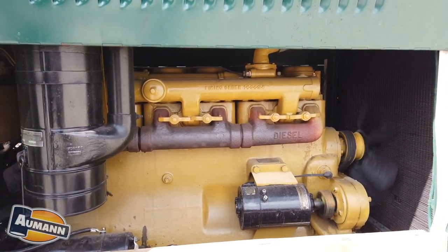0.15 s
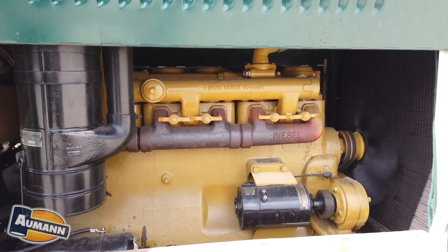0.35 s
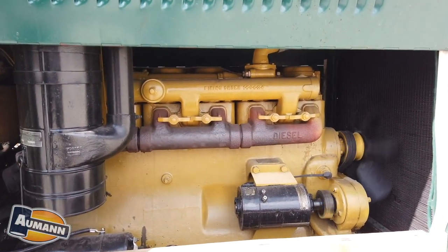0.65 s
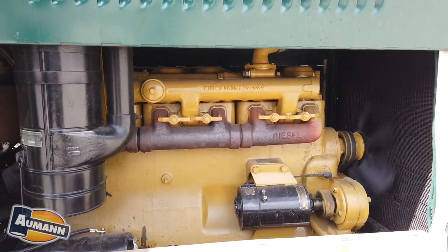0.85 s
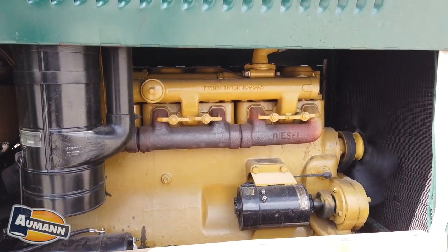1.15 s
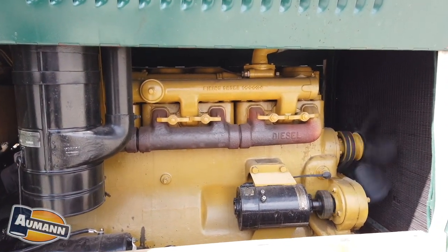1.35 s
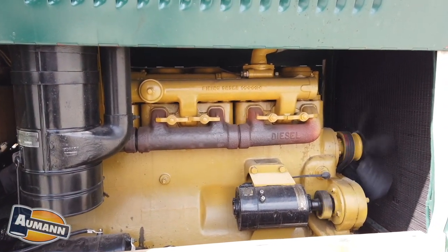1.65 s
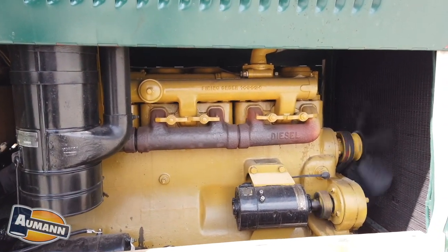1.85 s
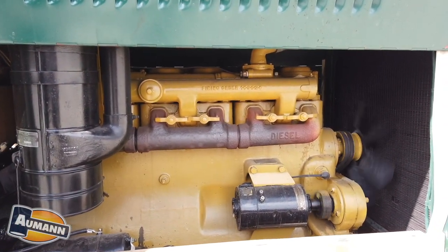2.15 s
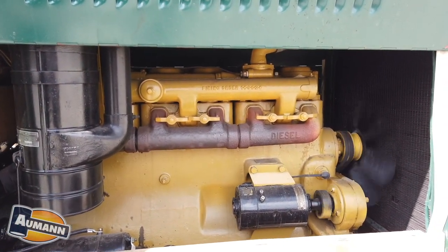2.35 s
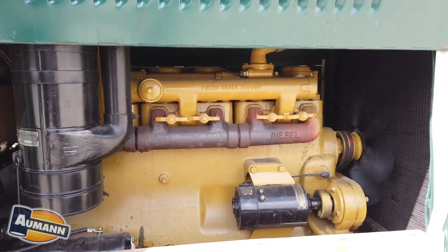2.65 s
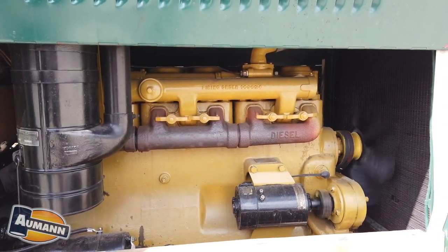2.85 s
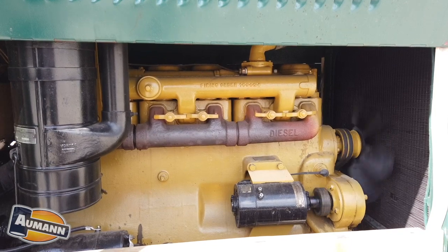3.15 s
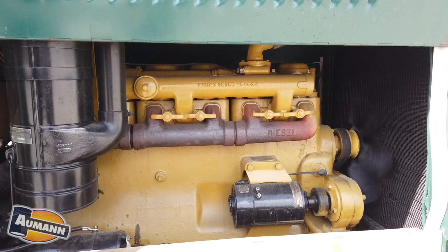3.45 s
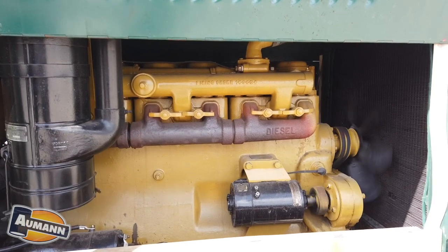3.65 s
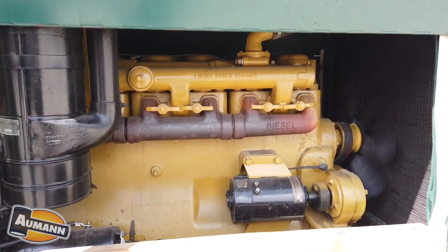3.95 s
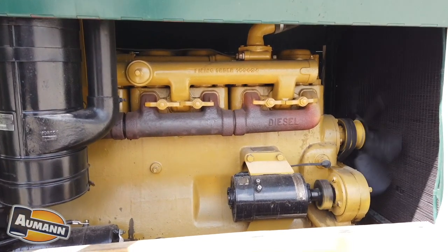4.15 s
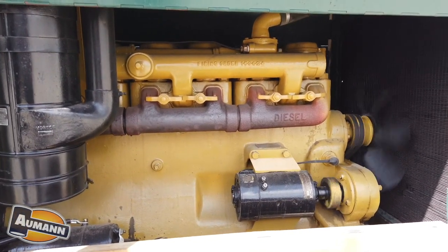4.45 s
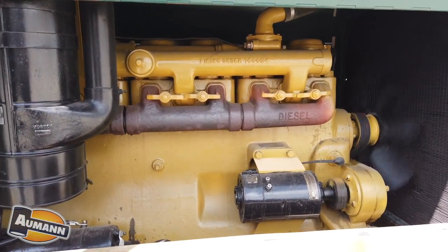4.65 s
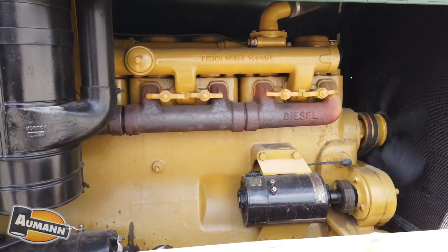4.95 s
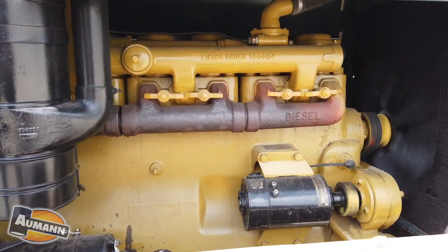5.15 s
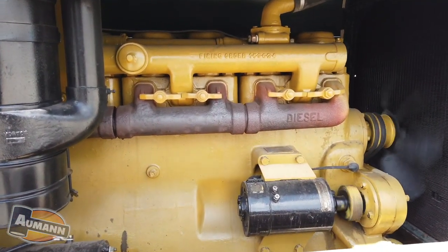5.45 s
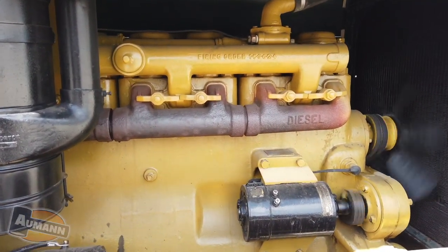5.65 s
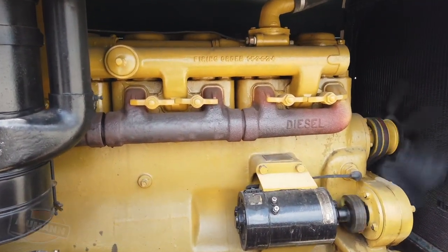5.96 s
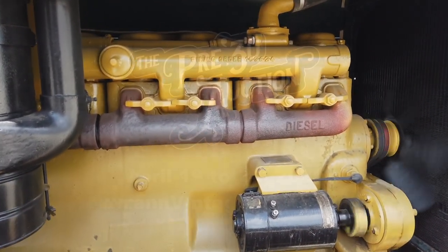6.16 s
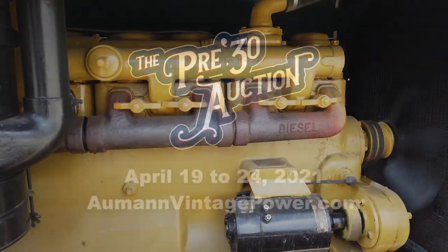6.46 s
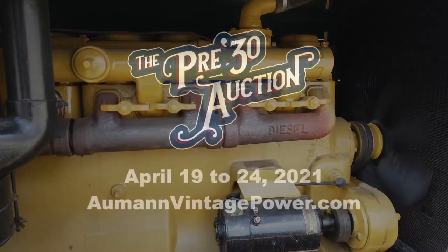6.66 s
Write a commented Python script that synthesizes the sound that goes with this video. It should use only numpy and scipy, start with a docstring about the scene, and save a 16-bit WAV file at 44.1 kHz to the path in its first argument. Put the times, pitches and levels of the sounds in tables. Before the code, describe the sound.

A big old diesel idles close by, knocking and ticking steadily over a fan roar, while wind gusts increasingly thump and overload the microphone.

```python
"""Idling diesel in gusty wind

A large old six-cylinder diesel idles in its open housing, close to a small microphone.
Each firing knocks and rings as noise and sines, valves and injectors tick as bursts through resonances,
and sines on the crankshaft hum over the fan's roar of shaped noise. Gusts of low noise buffet the
microphone, lightly at first, then with pressure strokes hard enough to drive its limiter."""
import sys
import numpy as np
from scipy import signal
from scipy.fft import rfft, irfft
from scipy.io import wavfile
from scipy.ndimage import uniform_filter1d

SR = 44100
rng = np.random.default_rng(int(sys.argv[2]) if len(sys.argv) > 2 else 0)


def log_audio(samples):
    """Write samples as a 16-bit WAV file to the path given in sys.argv[1]."""
    # one column per channel
    frames = np.atleast_2d(samples).T
    # limit to full scale, then quantise
    limited = np.clip(frames, -1, 1)
    pcm = np.round(limited * 32767).astype(np.int16)
    wavfile.write(sys.argv[1], SR, pcm)


N = 299439
STEP = 10  # envelopes are drawn at every tenth sample

# slow loudness of the engine at the microphone, fading at the end: (time [s], level [dB])
ENGINE_LEVEL = [(0, -41), (3.4, -41.5), (4.6, -41), (5.1, -40.5), (5.8, -43), (6.05, -41.5), (6.4, -42),
                (6.55, -47), (6.76, -46.5), (6.79, -61)]
# combustion knock of each cylinder:
# (place in the cycle [firings], ring level [dB], ring centre [Hz], low thud level [dB])
CYLINDER_KNOCKS = [(.8, -4, 2885, -2.5), (1.8, 1.5, 2857, -3), (2.75, 2.5, 3120, -3), (3.8, 2, 3212, -16),
                   (4.8, -2.5, 2936, -2), (5.85, 3, 3024, -10)]
# resonances of the block: (frequency [Hz], width [Hz], relative level [dB])
BLOCK_MODES = [(271, 14, 4.5), (392, 26, 10), (540, 59, -20), (692, 170, -6), (883, 87, 6), (1183, 13, 8.5),
               (1890, 620, -4), (2410, 19, -7)]
# valve and injector ticks:
# (place in the cycle [firings], level [dB], t60 [s], brightness [dB per octave], favoured frequency [Hz])
VALVE_TICKS = [(.43, -9.5, 0.03, -1, 9050), (.8, -17, 0.15, 9, 6120), (1.64, 3, 0.017, -0.5, 14100),
               (1.81, -6.5, 0.11, 8.5, 4480), (2.42, -21, 0.037, 1.5, 8900), (2.7, -15.5, 0.19, 4.5, 12200),
               (3.45, -22, 0.028, -13, 9100), (3.82, -9.5, 0.054, 12, 9800), (4.38, -12, 0.021, 11, 9000),
               (4.75, -19, 0.19, 14, 6630), (5.65, -11.5, 0.062, -6, 9000), (5.83, -10, 0.074, 16, 11600)]
# resonances of the valve gear: (frequency [Hz], width [Hz], relative level [dB])
GEAR_MODES = [(3990, 280, -12.5), (4170, 380, 4.5), (4750, 330, -1), (5630, 400, 5), (6180, 390, -3),
              (7390, 1270, -6.5), (8200, 780, -5.5), (8890, 240, -5), (9600, 800, -8.5), (10560, 600, -8),
              (11000, 1400, -13.5), (12800, 940, -14), (13700, 1000, -20.5), (14800, 940, -17.5)]
# the microphone drifts along the engine:
# (time [s], valve gear level [dB], valve gear brightness [dB per octave])
MIC_DRIFT = [(0, -1, 2), (1, -1, 2), (2, -2, 1.5), (3, -1.5, -0.5), (3.8, -3.5, -.6), (4.3, -1, -1.5),
             (4.9, -2, -2.5), (5.7, -1, 1.5), (6.2, -1, 1), (6.5, -1, 3), (6.79, 2, -3)]
# steady hum: (multiple of the firing rate [ratio], relative level [dB])
HUM_ORDERS = [(3, -57.5), (3.5, -75), (4, -59), (6, -66.5), (6.5, -63), (7, -72), (7.5, -65), (8, -63.5),
              (9, -65.5), (10, -59), (12, -54.5), (16, -55.5), (17.5, -67.5), (22, -55.5), (24, -62),
              (25, -57)]
# spectrum of fan, intake and rattle: (frequency [Hz], relative level per Hz [dB])
ROAR_SPECTRUM = [(35, -7), (60, -1), (142, -5.5), (386, -2), (487, -5), (587, -1), (659, -2), (1100, -8),
                 (1210, -7.5), (1830, -11), (2990, -16), (3950, -29), (6910, -36.5), (10500, -37.5),
                 (15600, -49)]
# slow heave of the air at the microphone: (time [s], level [dB])
HEAVE_LEVEL = [(0.0, -21), (0.76, -37.5), (0.93, -17), (1.23, -48.5), (1.42, -28.5), (2.15, -29),
               (2.55, -18.5), (2.82, -37), (3.16, -19.5), (3.5, -19), (3.54, -9), (3.78, -19), (3.84, -8.5),
               (4.27, -16), (4.31, -23), (4.8, -20), (4.9, -10), (5.14, -26.5), (5.29, -19.5), (5.96, -11),
               (6.03, -23), (6.17, -9), (6.58, -11.5), (6.79, -16)]
# gusts of finer turbulence: (start [s], length [s], flutter level [dB], rustle level [dB])
FINE_GUSTS = [(0.137, 0.21, -39.5, -66), (0.502, 0.11, -42, -55), (0.849, 0.11, -31.5, -51),
              (1.852, 0.052, -41, -75), (2.084, 0.078, -44, -55), (3.127, 0.32, -38.5, -67),
              (3.525, 0.11, -17.5, -35), (3.74, 0.089, -12, -48), (3.93, 0.17, -13, -32.5),
              (4.428, 0.15, -34, -54), (5.257, 0.054, -9, -33), (5.33, 0.092, -21.5, -36),
              (5.497, 0.13, -19.5, -38.5), (5.782, 0.086, -11.5, -35), (5.901, 0.043, -10, -10),
              (5.948, 0.063, -4, -15.5), (6.024, 0.043, -0.5, -27), (6.127, 0.1, -7, -56),
              (6.421, 0.076, -13.5, -41), (6.61, 0.25, -31.5, -46)]
# floor between gusts: (flutter level [dB], rustle level [dB])
CALM_LEVELS = [-59, -70]
# hard buffets, a suck then a slam; the engine's level moves between the two (mostly up)
# and again after the slam's peak (mostly down):
# (time [s], peak pressure ahead of the limiter [1], half length [s], swell [dB], dip [dB])
HARD_BUFFETS = [(0.897, 0.16, 0.011, 0, -1), (3.55, 0.52, .014, 3, -2.5), (3.652, .35, 0.018, 1.5, -2.5),
                (3.779, 0.15, 0.036, -1, -6.5), (3.912, 0.53, 0.046, 3.5, 2),
                (4.004, 0.66, 0.021, -2.5, -1), (4.164, 0.38, 0.02, .6, 1.2), (4.229, 0.28, 0.022, 3, 1),
                (4.69, 0.11, 0.04, 0, 2.5), (4.98, 0.15, .045, 3, 1), (5.261, 0.38, 0.023, 4, -7.5),
                (5.373, 0.53, 0.043, 4, -12), (5.683, 0.44, 0.07, 9, 5), (5.879, 1.17, .013, -1, -5.5),
                (5.943, 0.55, 0.0086, 7.5, -2), (6.023, 0.81, 0.0089, 2, -3.5), (6.134, 0.46, .018, 7, -7),
                (6.199, 0.6, .025, 7, -11), (6.068, 0.78, .012, 4, -5), (6.331, 0.95, 0.029, 1.2, 5.5),
                (6.394, 0.34, 0.015, 6.5, -2.5), (6.493, 0.28, 0.025, 3, -5.5)]

FIRING_HZ = 24.67  # mean rate of the idle
# the governor hunts: firings ahead of a steady idle
HUNT_MEAN, HUNT_SWING, HUNT_PERIOD_S, HUNT_PEAK_S = -0.2693, 0.1987, 6.15, 1.84
PING_DB, BONK_HZ, BONK_DB = 8, 819, 10  # clean rings of the gas and of one panel
SCATTER_DB = 4.0  # how unevenly one tick shakes the modes
SLIP = .0055  # turns by which a hum of order 1 wavers against the crankshaft
GUST_RISE_S, GUST_FALL_S = 0.019, 0.054  # exponential time constants
LUMPY_DB, LUMPS_HZ = 1.5, 7.7  # chance unevenness of all turbulence
SWELL_WIDTH, DIP_AFTER, DIP_S = 0.52, 1.38, 0.012  # in half lengths, in half lengths, in s
EDGE_HZ = 15750  # top of the recorded band


def gain_of(db):
    """Turns decibels into a factor."""
    return 10 ** (np.asarray(db) / 20)


def evened(x):
    """Scales to rms 1."""
    return x / np.sqrt(np.mean(x ** 2) + 1e-20)


def curve(rows):
    """Draws every column of a table against its times, sample by sample."""
    s, *columns = np.transpose(rows)
    return [np.interp(np.arange(N) / SR, s, c) for c in columns]


def coloured(x, gain):
    """Filters by a gain given as a function of frequency."""
    return irfft(rfft(x) * gain(np.fft.rfftfreq(N, 1 / SR) + 1e-3), N)


def resonate(x, hz, width):
    """A fixed resonance of gain 1 at its peak."""
    return signal.lfilter(*signal.iirpeak(hz, hz / width, SR), x)


def glide(x, hz, width):
    """Shifts the curve hz down to zero, smooths twice, and shifts back: a steep moving resonance."""
    turn = np.exp(2j * np.pi * np.cumsum(hz) / SR)
    r = np.exp(-np.pi * width / SR)
    smooth = signal.lfilter([(1 - r) ** 2], [1, -2 * r, r ** 2], x / turn)
    return 2 * (turn * smooth).real


def held(envelope):
    """Spreads a coarse envelope over every sample."""
    return np.repeat(envelope, STEP)[:N]


def shaken(envelope):
    """Noise under a coarse envelope."""
    return held(envelope) * rng.standard_normal(N)


def firings():
    """Running count of firings: a steady idle plus the slow swing of the hunting governor."""
    t = np.arange(N) / SR
    swing = np.cos(2 * np.pi * (t - HUNT_PEAK_S) / HUNT_PERIOD_S)
    return FIRING_HZ * t + HUNT_MEAN + HUNT_SWING * swing


def blows(count, place, t60, rise_s, spread_db, jitter_s):
    """Coarse envelope of one blow in every cycle, early or late, weak or strong; and the cycle number."""
    since = count[::STEP] - place
    cycle = np.floor(since / 6 + 1 / 12).astype(int)  # leaves half a firing of room for early blows
    late, strong = rng.standard_normal((32, 2))[cycle + 1].T
    t = np.maximum((since - 6 * cycle) / FIRING_HZ - jitter_s * late, 0)
    shape = (1 - np.exp(-t / rise_s)) * gain_of(spread_db * strong - 60 * t / t60)
    return shape, cycle + 1


def knock(count):
    """The pressure jump in each cylinder rings its gas near 3 kHz, never twice alike, and thuds the block."""
    ring = thud = 0
    for place, ring_db, _, thud_db in CYLINDER_KNOCKS:
        blow, _ = blows(count, place, t60=0.093, rise_s=0.011, spread_db=1.5, jitter_s=0.00032)
        ring = ring + gain_of(ring_db) * blow
        thud = thud + gain_of(thud_db) * blow

    # the pitch steps to the next cylinder just before its knock, and strays at each firing
    firing = np.floor(count + 1.25).astype(int)
    cylinder_hz = np.roll(np.transpose(CYLINDER_KNOCKS)[2], 2)
    hz = cylinder_hz[firing % 6] * (1 + .02 * rng.standard_normal(180)[firing])
    drive = shaken(ring)
    ping = held(ring ** 2) * np.sin(2 * np.pi * np.cumsum(hz) / SR)  # squared: the clean part is shorter
    gas = gain_of(PING_DB) * ping
    gas += gain_of(15) * glide(drive, hz, 530)
    gas += gain_of(14.0) * resonate(resonate(drive, 2680, 810), 2570, 890)

    # one cylinder rings a wall panel
    panel, _ = blows(count, CYLINDER_KNOCKS[1][0], t60=0.067, rise_s=0.0048, spread_db=2.3, jitter_s=0.0015)
    bonk = held(panel) * np.sin(2 * np.pi * BONK_HZ * np.arange(N) / SR)

    thud_drive, block = shaken(thud), np.zeros(N)
    for k, (mode_hz, width, db) in enumerate(BLOCK_MODES):
        level = gain_of(db + 2.46 * rng.standard_normal(180)[firing])
        block += level * resonate(thud_drive, mode_hz, width) * (-1) ** k  # neighbours in opposite phase
    return gas + gain_of(20.5) * block + gain_of(BONK_DB) * bonk


def ticks(count):
    """Each tick shakes the valve gear's modes, most those near its own, by amounts that change each cycle."""
    shapes = [blows(count, place, t60, rise_s=0.0026, spread_db=1.5, jitter_s=0.0019)
              for place, _, t60, _, _ in VALVE_TICKS]
    level_db, tilt_db = curve(MIC_DRIFT)
    out = np.zeros(N)
    for hz, width, mode_db in GEAR_MODES:
        octaves = np.log2(hz / 8000)  # brightness tilts about 8 kHz
        shake = 0
        for (_, db, _, bright_db, own_hz), (shape, cycle) in zip(VALVE_TICKS, shapes):
            near_db = 8.6 * np.exp(-(np.log2(hz / own_hz) / 0.16) ** 2)
            chance_db = SCATTER_DB * rng.standard_normal(32)
            shake = shake + gain_of(db + near_db + bright_db * octaves + chance_db)[cycle] * shape
        rung = resonate(resonate(shaken(shake), hz, width), hz, 2.1 * width)
        out += gain_of(mode_db + 8 + level_db + tilt_db * octaves) * rung
    return out


def roar():
    """Fan, intake and rattle: broad noise whose level drifts in patches of time and frequency."""
    frames = N // 128 + 5
    a, b, patches = rng.standard_normal((frames, 257, 3)).T
    patches = uniform_filter1d(patches, 6, 0)  # across frequency
    patches = evened(uniform_filter1d(patches, 12, 1))  # across time
    spectra = (a + 1j * b) * gain_of(1.6 * patches)
    noise = signal.istft(spectra, nperseg=512, noverlap=384)[1][:N]
    f, db = np.transpose(ROAR_SPECTRUM)
    return evened(coloured(noise, lambda hz: gain_of(np.interp(np.log(hz), np.log(f), db))))


def hum(count):
    """Sines locked to the crankshaft; the higher ones waver more in level and pitch."""
    out = np.zeros(N)
    for order, db in HUM_ORDERS:
        swell, slip = (np.interp(np.arange(N), np.linspace(0, N, 70), v)
                       for v in rng.standard_normal((70, 2)).T)
        turns = order * count + SLIP * order ** 1.525 * slip + rng.random()
        out += gain_of(db + order / 4 * swell) * np.sqrt(2) * np.sin(2 * np.pi * turns)
    return out


def gusts():
    """Strength of heave, flutter and rustle: each gust of the finer two rises fast, holds and dies away."""
    t = np.arange(0, N, STEP) / SR
    start, length, *levels_db = np.transpose(FINE_GUSTS)[:, :, None]
    rise = np.minimum(t - start, 0) / GUST_RISE_S
    fall = np.maximum(t - start - length, 0) / GUST_FALL_S
    shape = np.exp(rise - fall)
    fine = [held(gain_of(calm_db) + (gain_of(db) * shape).sum(0))
            for calm_db, db in zip(CALM_LEVELS, levels_db)]
    return [gain_of(curve(HEAVE_LEVEL)[0])] + fine


def wind(cover):
    """Three scales of eddies in uneven lumps, partly swept away by the hard buffets."""
    out = np.zeros(N)
    # heave, flutter, rustle: (peak [Hz], slope below, slope above, share a buffet sweeps away)
    eddies = [(9.1, 1.46, 3.2, 0.44), (43.6, 1.22, 4.72, 0.58), (100.5, 0.97, 6.6, 0.26)]
    for level, (top_hz, below, above, swept) in zip(gusts(), eddies):
        eddy = coloured(rng.standard_normal(N),
                        lambda hz: 1 / ((top_hz / hz) ** below + (hz / top_hz) ** above))
        power = abs(uniform_filter1d(eddy ** 2, int(3 * SR / top_hz)))
        steady = eddy / np.sqrt(power + 1e-12)  # so the gusts alone set the strength
        lumps = evened(coloured(rng.standard_normal(N), lambda hz: 1 / (1 + (hz / LUMPS_HZ) ** 2)))
        out += level * gain_of(LUMPY_DB * lumps) * steady * (1 - swept * cover)
    return out


def buffets():
    """Suck-and-slam pressure, how fully it covers each moment, and the dB by which it moves the engine."""
    t = np.arange(N) / SR
    s, push, half, swell_db, dip_db = np.transpose(HARD_BUFFETS)[:, :, None]
    u = (t - s) / half
    pressure = (push * u * np.exp(.5 - .5 * u ** 2)).sum(0)  # peaks at u = -1 and 1
    cover = np.exp(-u ** 2 / 8).max(0)
    swell = swell_db * np.exp(-.5 * (u / SWELL_WIDTH) ** 2)
    dip = dip_db * np.exp(-.5 * ((u - DIP_AFTER) * half / DIP_S) ** 2)
    return pressure, cover, (swell + dip).sum(0)


def scene():
    """The engine parts share one loudness, which the buffets move; the wind adds its own pressure."""
    count = firings()
    engine = knock(count) + ticks(count) + gain_of(-1.5) * roar() + gain_of(39.0) * hum(count)
    pressure, cover, move_db = buffets()
    engine_gain = gain_of(curve(ENGINE_LEVEL)[0] + move_db)
    return (engine_gain * engine + wind(cover) + pressure)[None]


def record(dry):
    """A limiter ducks everything under the buffets; sudden ones slip past it and clip; then the band limit."""
    x = dry[0] - dry.mean()  # no steady pressure passes
    over_db = np.maximum(20 * np.log10(abs(x) / 0.443 + 1e-9), 0)
    fall_db = np.arange(N) * 460.0 / SR  # recovers this many dB a second
    held_db = np.maximum.accumulate(over_db + fall_db) - fall_db
    lag = np.exp(-1 / (0.0027 * SR))  # it takes a few milliseconds to act
    duck_db = 0.853 * signal.lfilter([1 - lag], [1, -lag], held_db)
    limited = np.clip(x / gain_of(duck_db), -.61, .61)
    low_pass = signal.firwin(2047, EDGE_HZ, window=("kaiser", 9), fs=SR)
    return signal.oaconvolve(limited, low_pass, "same")[None]


dry = scene()
out = record(dry)
log_audio(out)
```